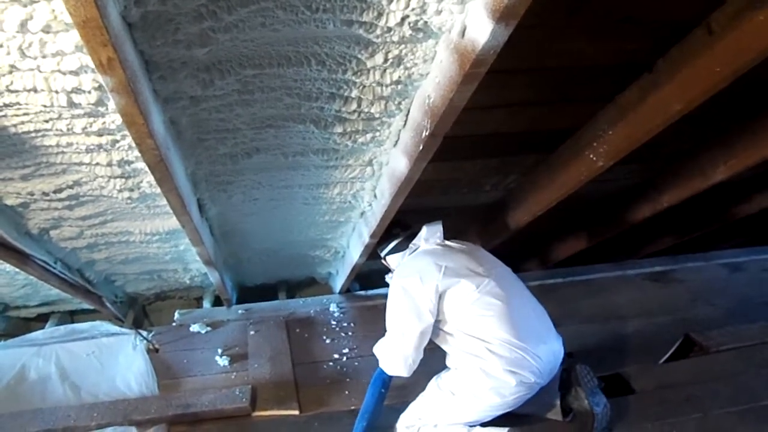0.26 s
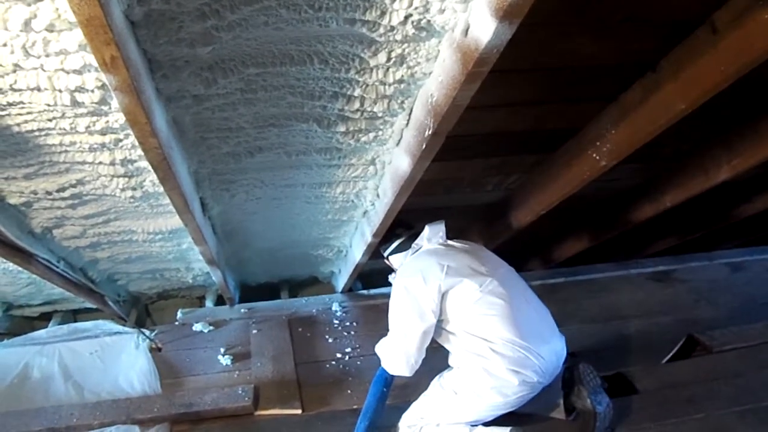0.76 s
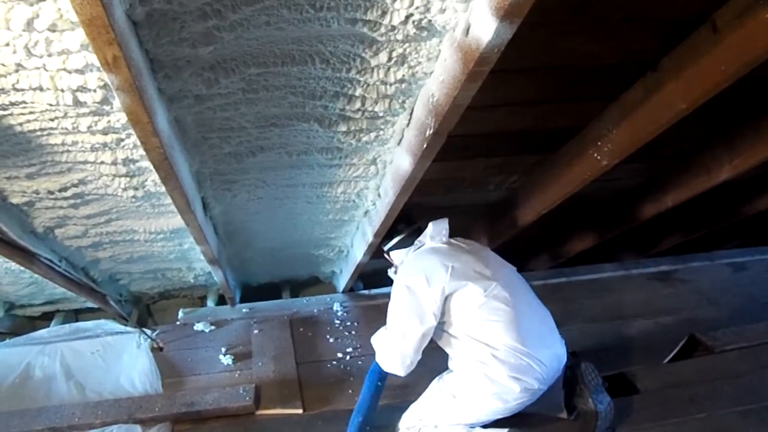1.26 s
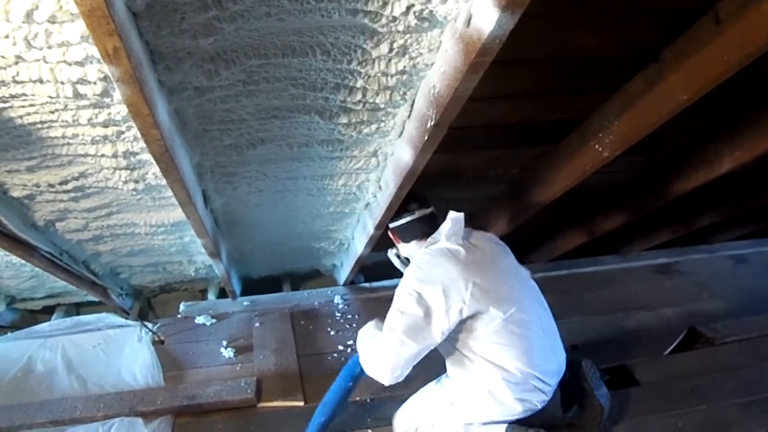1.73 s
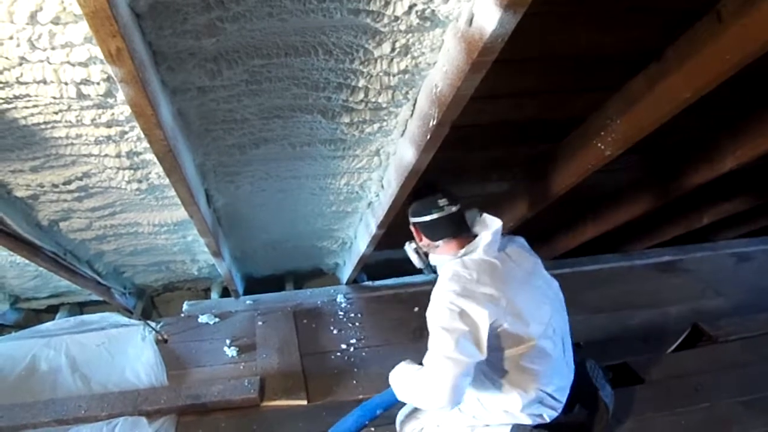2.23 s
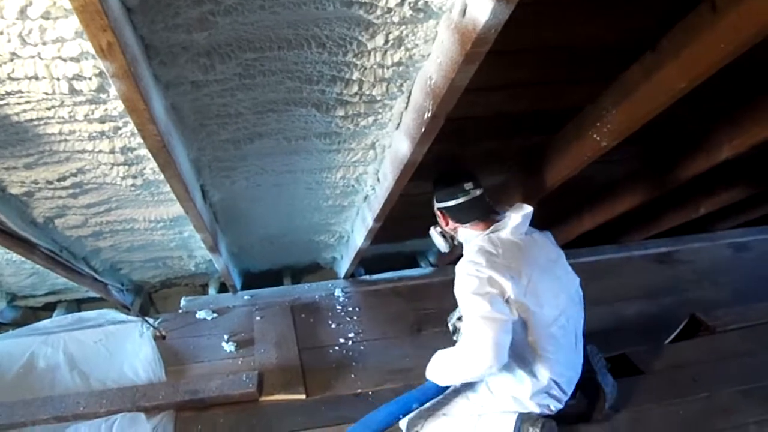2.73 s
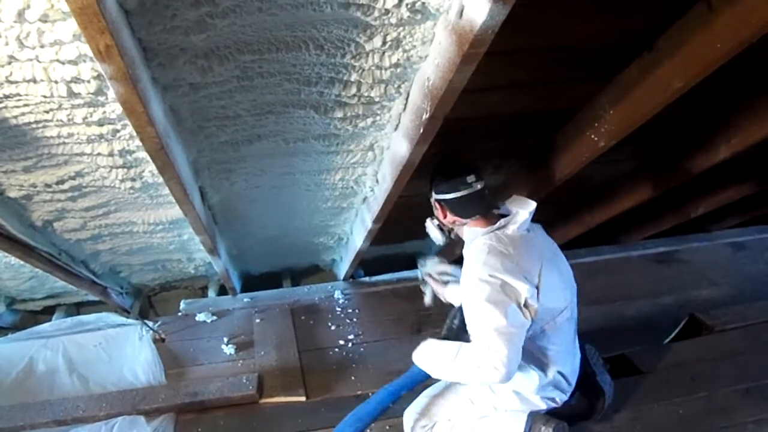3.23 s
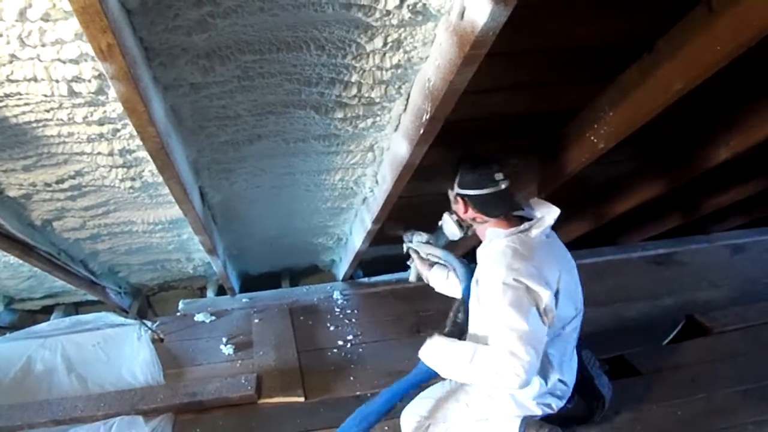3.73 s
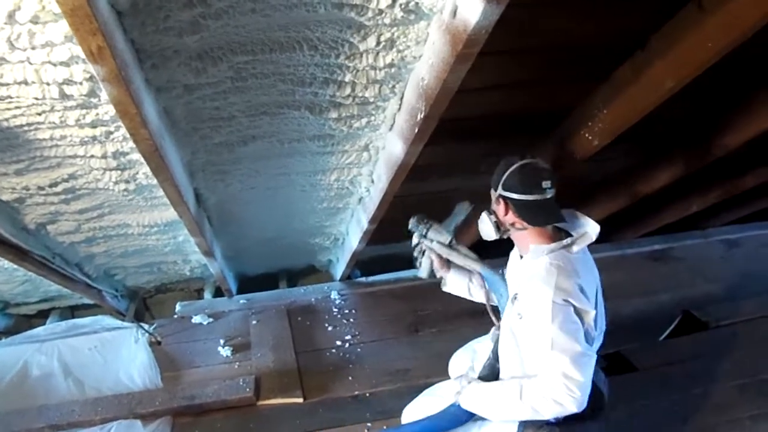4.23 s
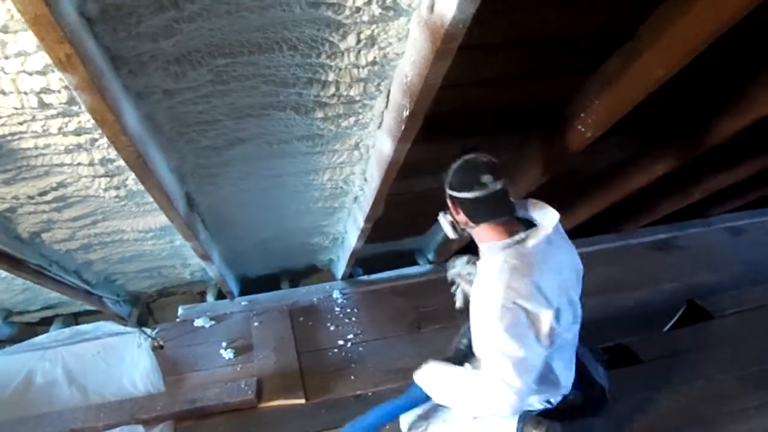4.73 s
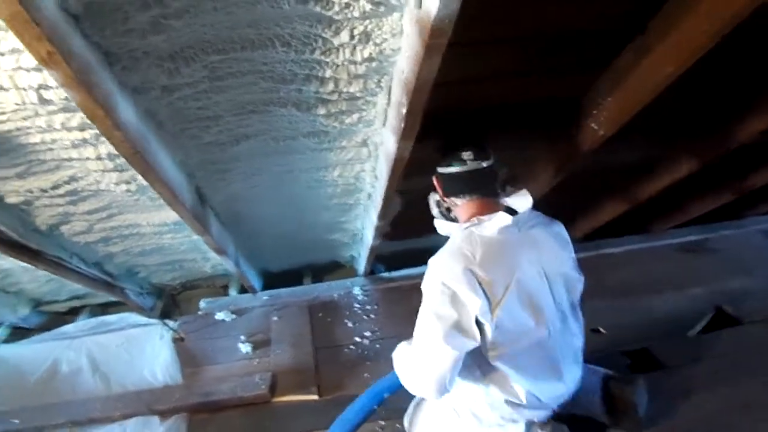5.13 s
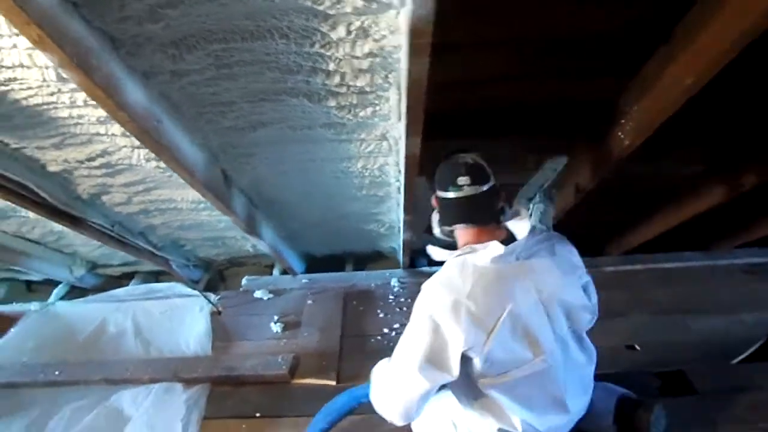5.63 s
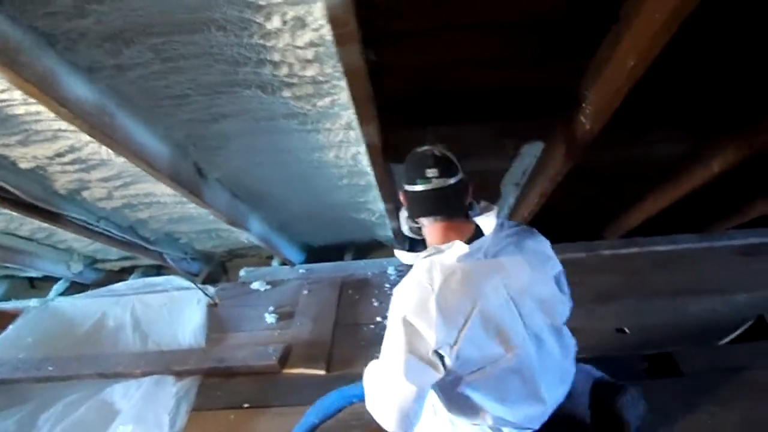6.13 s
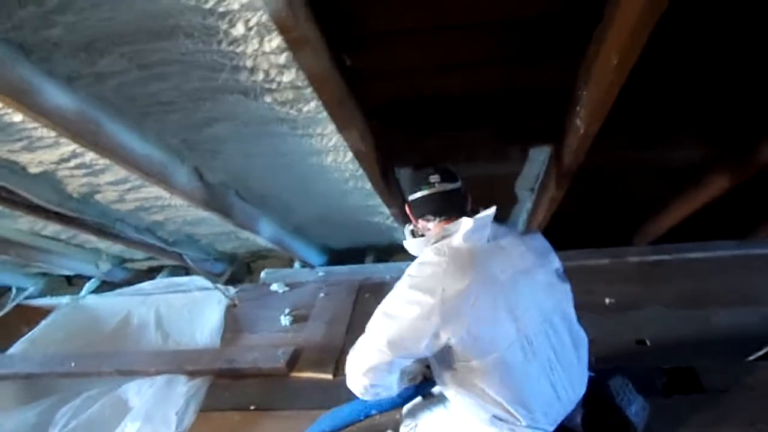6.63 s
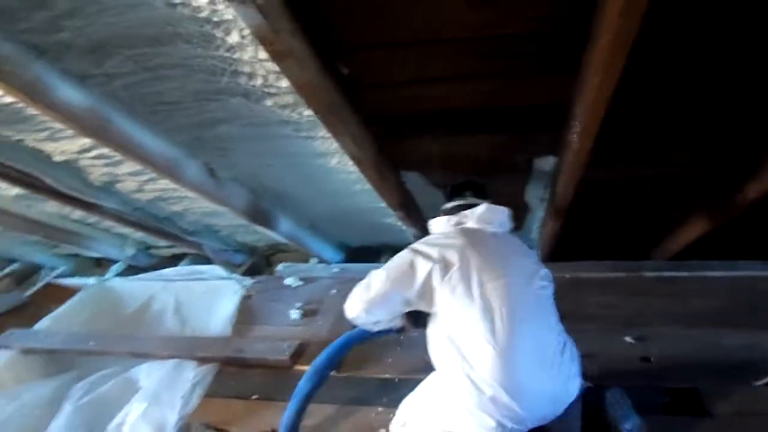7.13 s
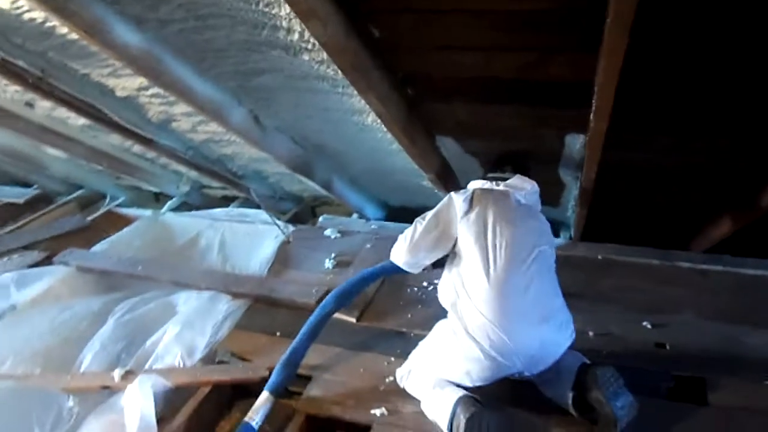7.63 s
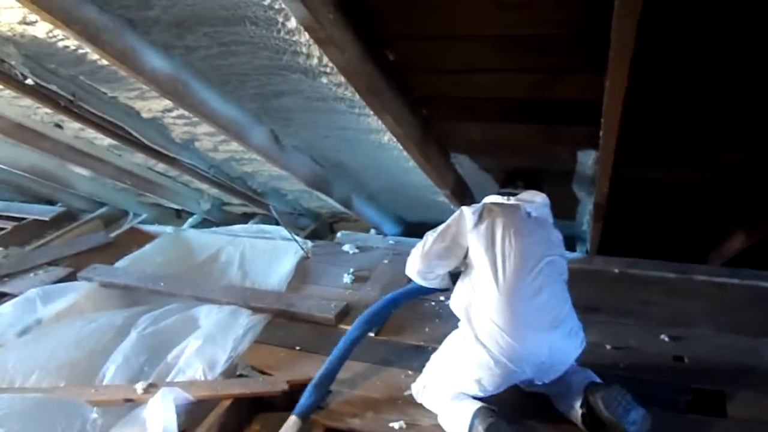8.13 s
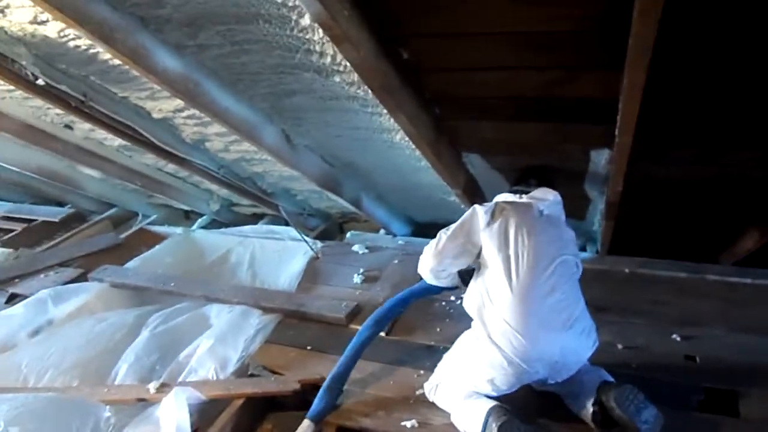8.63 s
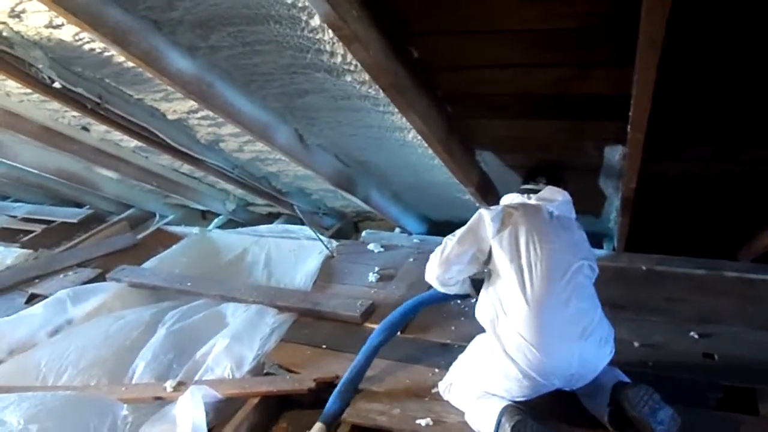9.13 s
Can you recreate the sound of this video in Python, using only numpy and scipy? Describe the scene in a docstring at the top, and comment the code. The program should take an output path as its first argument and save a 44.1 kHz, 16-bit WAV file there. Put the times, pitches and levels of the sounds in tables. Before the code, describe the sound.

Soft air hiss and low machine throb, then a one-second spray burst that closes with a puff and a hard wooden knock. Two brief spurts follow, with rustling, faint creaks and board thumps between them. The hiss grows as the worker shifts and bumps the planks, then a loud long spray runs to the end with hollow taps. Close, dry attic, one microphone.

```python
"""A foam gun in a boarded attic: each trigger pull is a jet of turbulent noise through a short pipe, closed at
one end, that rings at odd multiples. Purge air, shaped noise, hisses at the tip between pulls. The kneeling worker
rustles and rumbles (noise), knocks and taps (decaying modes) and creaks the boards (narrow noise). A far compressor,
sines on one stroke rate, runs down and leaves a slower engine; a drone, a whine and attic air lie under it.
One microphone."""
import sys
import numpy as np
from scipy import signal
from scipy.fft import rfft, irfft
from scipy.io import wavfile
from scipy.ndimage import uniform_filter1d, map_coordinates

SR = 44100
rng = np.random.default_rng(int(sys.argv[2]) if len(sys.argv) > 2 else 0)


def generate_wav(sig):
    """Save sig (samples, or channels by samples) to the path in sys.argv[1] as 16-bit PCM at SR."""
    pcm = np.round(np.clip(np.atleast_2d(sig).T, -1, 1) * 32767).astype(np.int16)
    wavfile.write(sys.argv[1], SR, pcm)


N = 412776

# Trigger pulls. Each row: pulled in seconds, let go in seconds, burst level in dB, steady jet level in dB,
# settling time constant in seconds, creep in dB per second, pipe ring over the jet in dB, puff level in dB,
# change of ring in the puff in dB.
TRIGGER_PULLS = [(0.907, 1.809, -17.5, -35, 0.19, 3.5, -15.5, -20, -5),
                 (3.648, 3.988, -11.5, -32.5, 0.35, -0.5, -13, -19, -2),
                 (5.283, 5.574, -22, -36, 0.49, -2, -11.5, -21.5, -6),
                 (7.7, 9.6, -10, -31, 0.19, 3.5, -12, -20, -4)]
# Jet turbulence spectrum. Each row: frequency in Hz, relative density in dB per Hz.
JET_SPECTRUM = [(300, -19.5), (600, -21.5), (1500, -15.5), (3000, -10.5), (4500, -6.5), (6000, -4),
                (9000, -4), (14000, -3.5), (15000, 0.5)]
# Pipe modes. Each row: frequency in Hz, width of each of two cascaded peaks in Hz, relative level in dB.
PIPE_MODES = [(771, 96, -18), (2271, 330, 1), (3730, 380, -2), (5280, 450, 0), (6870, 730, -2.5),
              (8350, 310, -4), (10070, 380, -7.5), (11290, 450, -11.5), (12600, 510, -5.5)]
# Brief flares of the pipe ring. Each row: centre in seconds, added level in dB, detune in per cent.
RING_FLARES = [(.918, 9.5, -1), (1.0, 0.5, -2), (1.051, 11, 1), (1.189, 8.5, -9), (1.25, 7.5, 0),
               (3.655, 5.5, 1), (3.75, 4, -1), (3.8, 7.5, -0.5), (3.9, 1.5, -0.5), (5.295, 1.5, 2),
               (5.37, 2.5, -1), (5.47, 3.5, 1.5), (5.55, -0.5, -0.5), (7.708, 10, 0), (7.775, 4, -0.5),
               (7.82, 2, -0.5)]
# Purge air while open. Each row: time in seconds, level in dB.
PURGE_LEVEL = [(0, -41), (.4, -39.5), (.75, -40), (.905, -36), (1.95, -44), (2.2, -39), (2.65, -35.5),
               (2.9, -37), (3.647, -29), (4.12, -40.5), (4.55, -39), (5.2, -42), (5.285, -37), (5.7, -37),
               (6.25, -37), (6.75, -36), (7.15, -30.5), (7.5, -31.5), (7.697, -28.5)]
# Purge air spectrum. Each row: frequency in Hz, relative density in dB per Hz.
PURGE_SPECTRUM = [(900, -37), (1500, -18.5), (2300, -9), (3800, -10), (5100, -4), (8000, -0.5),
                  (10000, -3.5), (12000, -0.5), (14000, -1), (15000, -3)]
# The worker's moves. Each row: start in seconds, length in seconds, suit and hose rustle in dB, board rumble in dB.
WORKER_MOVES = [(0.893, 1, -48.5, -55.5), (1.914, .08, -65, -35.5), (2.415, 0.31, -46.5, -49),
                (2.798, 0.9, -55.5, -57.5), (3.367, 0.22, -45, -48.5), (3.683, 0.38, -49, -56),
                (4.368, 0.045, -55.5, -57), (4.68, 0.095, -52, -54), (5.39, 0.24, -45.5, -45),
                (5.75, 0.44, -59, -63), (6.286, .08, -52, -48), (6.47, .3, -67, -45),
                (6.86, 0.37, -53, -56.5), (7.082, 0.1, -45, -38.5), (7.218, 0.1, -41, -44),
                (7.414, 0.28, -45, -46.5), (7.686, 0.029, -29.5, -43), (7.826, 0.076, -38.5, -40),
                (7.906, 0.43, -43, -43), (8.394, 0.57, -41.5, -53), (8.99, .4, -43.5, -41.5)]
# Rustle spectrum. Each row: frequency in Hz, relative density in dB per Hz.
RUSTLE_SPECTRUM = [(300, 4), (500, -1), (1000, 5.5), (2000, -0.5), (3000, -2.5), (5000, 0), (7000, -42)]
# Board rumble spectrum. Each row: frequency in Hz, relative density in dB per Hz.
RUMBLE_SPECTRUM = [(60, 4.5), (110, -2.5), (250, 1), (350, -3.5), (500, -10), (800, -11), (1200, -33)]
# Knees and hose on the boards. Each row: start in seconds, level of the ring's peak before decay in dB,
# pitch of the blow in Hz, t60 in seconds (on top of each part's own decay), joist thump before decay in dB rms.
BOARD_KNOCKS = [(1.905, -14.5, 630, 0.33, -33), (1.991, -33, 450, 0.71, -31.5),
                (3.599, -37, 360, 0.19, -54), (5.41, -30.5, 259.8, 1, -41), (5.46, -40, 685, 0.21, -62),
                (6.473, -37, 850, 0.14, -75), (6.496, -30, 200, 0.24, -54),
                (6.511, -25.5, 228, 0.41, -32.5), (7.087, -24, 880, 0.2, -55), (7.1, -38, 296, 0.75, -53),
                (7.25, -22, 250, 0.34, -61), (7.277, -19.5, 245, 0.42, -56), (7.308, -19, 257, 0.53, -53),
                (7.845, -21, 1200, 0.073, -62), (7.949, -27, 204, 0.5, -48), (8.129, -30, 239.4, 0.25, -44),
                (8.266, -27, 242, 0.31, -55)]
# Board modes. Each row: frequency in Hz, relative level in dB, t60 in seconds.
BOARD_MODES = [(136, -3.5, 0.63), (199, 1, 0.67), (240, -2, 0.27), (276.4, 0, 1), (345, -3, 0.4),
               (390, -28, 0.37), (492, -1, .4), (638, -22.5, 0.45), (703, -2.5, 0.56), (797, -4.5, 0.45),
               (914, -1, 0.13), (1020, -4, 0.099), (1460, -2, .1)]
# Boards creaking under load. Each row: start in seconds, length in seconds, frequency in Hz, level in dB rms.
BOARD_CREAKS = [(3.383, 0.32, 355, -49.5), (4.37, 0.062, 378, -56), (4.67, 0.077, 355, -56),
                (4.775, 0.11, 310, -47)]
# Taps on something hollow. Each row: start in seconds, level in dB.
HOLLOW_TAPS = [(8.953, -34), (9.201, -31)]
# Modes of the hollow thing. Each row: frequency in Hz, relative level in dB, t60 in seconds.
HOLLOW_MODES = [(131.5, -4.5, 0.97), (200, -2.5, 0.41), (274, -0.5, 0.81), (350, -9, 0.59), (504, -9, 0.35),
                (590, -2.5, 0.14), (712, -2, 0.23), (816, -9, 0.7)]
# Compressor run-down. Each row: time in seconds, strokes per second, level in dB.
COMPRESSOR_RUN = [(0, 27.5, -43.5), (5.3, 27.5, -43.5), (5.6, 24.8, -49), (5.85, 22, -56), (6.05, 20, -85)]
# Compressor partials. Each row: multiple of the stroke rate, relative level in dB.
STROKE_PARTIALS = [(.5, -13), (1, 0), (2, -9), (3, -15), (4, -7), (5, -19)]
# Engine lines. Each row: frequency in Hz, full-load level in dB rms.
ENGINE_LINES = [(16, -58), (48, -61), (61, -63), (97, -53)]
# Engine load. Each row: time in seconds, level over full load in dB.
ENGINE_LOAD_CURVE = [(0, -14), (5.7, -14), (6, 0), (9.36, 0)]
# Narrow machine whine. Each row: frequency in Hz, width in Hz, level in dB rms.
WHINE_BANDS = [(478, 14, -66.5), (1200, 7.4, -67.5)]
# Attic background spectrum. Each row: frequency in Hz, relative density in dB per Hz.
AIR_SPECTRUM = [(7.1, -10), (12, 10.5), (32, -5), (65, 0), (106, -1), (127, -23), (162, -7.5), (221, -20),
                (462, -10.5), (600, -112), (780, -51), (1320, -120)]

OPEN_S, OPEN_TREBLE_DB, TREBLE_FADE_S = 0.011, 5, 0.14
RING_DIP_DB, RING_BUILD_S, FLARE_S = -11, 0.02, 0.02
PUFF_RISE_S, PUFF_HOLD_S, PUFF_FALL_DB_PER_S = 0.032, 0.017, 312
PURGE_BACK_S = 0.11  # wait after letting go
MOVE_RISE_S, MOVE_FALL_S, STILL_RUSTLE_DB, STILL_RUMBLE_DB = 0.017, 0.074, -58, -60.5
DRONE_HZ, DRONE_DB, AIR_DB = 30.4, -53, -55
ATTIC_T60_S, ATTIC_DB = 0.15, -16
HEADROOM, CUTOFF_HZ = 0.54, 13960


def from_db(db):
    """Decibels to gain."""
    return 10 ** (np.asarray(db) / 20)


def rms_one(x):
    """Scale to unit rms."""
    return x / np.sqrt(np.mean(x ** 2) + 1e-20)


def in_time(rows):
    """Interpolate the columns of a table at every sample."""
    s, *columns = np.transpose(rows)
    return [np.interp(np.arange(N) / SR, s, c) for c in columns]


def drift(rate_hz):
    """Slow random wander of unit rms: noise through a double pole, run at SR / 40."""
    r = np.exp(-80 * np.pi * rate_hz / SR)
    noise = rng.standard_normal(N // 40 + 2002)
    slow = signal.lfilter([1], [1, -2 * r, r * r], noise)[2000:]  # drop the filter's start
    return np.interp(np.arange(N) / 40, np.arange(len(slow)), rms_one(slow))


def coloured(spectrum, flicker_db, rate_hz):
    """Unit-rms noise of this spectrum; octaves flicker partly together, partly alone."""
    hz = np.arange(N // 2 + 1) * SR / N + 1e-3
    at_hz, db = np.transpose(spectrum)
    density_db = np.interp(np.log(hz), np.log(at_hz), db, left=-90)
    shaped = rfft(rng.standard_normal(N)) * from_db(density_db)
    together, out = drift(rate_hz), 0
    first, last = np.floor(np.log2(at_hz[0])), np.ceil(np.log2(at_hz[-1]))
    for centre_hz in 2. ** np.arange(first, last + 1):
        share = np.clip(1 - np.abs(np.log2(hz / centre_hz)), 0, 1)
        flicker = from_db(flicker_db * (0.8 * together + drift(rate_hz)))
        out = out + irfft(shaped * share, N) * flicker
    return rms_one(out)


def resonance(x, hz, width_hz):
    """Two-pole peak with gain 1 on top."""
    r = np.exp(-np.pi * width_hz / SR)
    feedback = [1, -2 * r * np.cos(2 * np.pi * hz / SR), r * r]
    return signal.lfilter([(1 - r * r) / 2, 0, (r * r - 1) / 2], feedback, x)


def double_resonance(x, hz, width_hz):
    """Two equal peaks in cascade: steeper skirts."""
    return resonance(resonance(x, hz, width_hz), hz, width_hz)


def bump(start_s, rise_s, hold_s, fall_s):
    """Linear rise to 1, hold, then exponential decay."""
    t = np.arange(N) / SR - start_s
    return np.clip(t / rise_s, 0, 1) * np.exp(-np.maximum(t - rise_s - hold_s, 0) / fall_s)


def purge_air():
    """Turbulent hiss at the tip, shut off while the trigger is pulled."""
    level_db, = in_time(PURGE_LEVEL)
    t = np.arange(N) / SR
    shut = sum(1. * ((t > on) & (t < off + PURGE_BACK_S)) for on, off, *_ in TRIGGER_PULLS)
    valve = uniform_filter1d(1 - shut, size=600, mode="nearest")  # 14 ms ramps
    return valve * from_db(level_db) * coloured(PURGE_SPECTRUM, flicker_db=0.5, rate_hz=27.0)


def movement_gains():
    """Rustle and rumble gains: the powers of a quiet floor and of each move's swell add."""
    swells = np.array([bump(s, MOVE_RISE_S, length, MOVE_FALL_S) ** 2 for s, length, *_ in WORKER_MOVES])
    _, _, rustle_db, rumble_db = np.transpose(WORKER_MOVES)
    rustle = np.sqrt(from_db(STILL_RUSTLE_DB) ** 2 + from_db(rustle_db) ** 2 @ swells)
    rumble = np.sqrt(from_db(STILL_RUMBLE_DB) ** 2 + from_db(rumble_db) ** 2 @ swells)
    return rustle, rumble


def movement():
    """Friction noise of suit and hose, and low noise of weight shifting on the boards."""
    rustle_gain, rumble_gain = movement_gains()
    rustle = rustle_gain * coloured(RUSTLE_SPECTRUM, flicker_db=1.5, rate_hz=22.0)
    rumble = rumble_gain * coloured(RUMBLE_SPECTRUM, flicker_db=2.5, rate_hz=8.4)
    return rustle + rumble


def wavering(phase, db):
    """A sine at this rms level, swelling and sinking with 1 dB rms."""
    return np.sqrt(2) * from_db(db + drift(2)) * np.sin(phase + rng.uniform(0, 2 * np.pi))


def compressor():
    """Harmonics of a stroke rate that slows and fades."""
    strokes_per_s, db = in_time(COMPRESSOR_RUN)
    phase = 2 * np.pi * np.cumsum(strokes_per_s * (1 + 0.003 * drift(2))) / SR
    return sum(wavering(k * phase, db + part_db) for k, part_db in STROKE_PARTIALS)


def engine_and_drone():
    """Low lines sharing one unsteady clock; the drone beats with the compressor."""
    clock = 2 * np.pi * np.cumsum(1 + 0.006 * drift(2)) / SR
    load_db, = in_time(ENGINE_LOAD_CURVE)
    engine = sum(wavering(hz * clock, load_db + line_db) for hz, line_db in ENGINE_LINES)
    return engine + wavering(DRONE_HZ * clock, DRONE_DB)


def whine():
    """Noise through narrow peaks, wandering in level."""
    return sum(from_db(db + 2 * drift(0.58)) * rms_one(resonance(rng.standard_normal(N), hz, width_hz))
               for hz, width_hz, db in WHINE_BANDS)


def attic_air():
    """Low background noise of the attic."""
    return from_db(AIR_DB) * coloured(AIR_SPECTRUM, flicker_db=4.0, rate_hz=12)


def trigger():
    """Jet gain, ring over jet, detune and extra treble: a burst that settles, then a puff on letting go."""
    t = np.arange(N) / SR
    jet, ring_db, treble_db = np.zeros(N), np.zeros(N), np.zeros(N)
    for on, off, burst_db, steady_db, settle_s, creep, pipe_db, puff_db, puff_ring_db in TRIGGER_PULLS:
        since = np.maximum(t - on, 0)
        let_go = np.maximum(t - off, 0)
        falling = np.maximum(t - off - PUFF_RISE_S - PUFF_HOLD_S, 0)
        flow = from_db(steady_db + creep * since + (burst_db - steady_db) * np.exp(-since / settle_s))
        puff = np.clip((t - off) / PUFF_RISE_S, 0, 1)
        opening = 1 - np.exp(-since / OPEN_S)
        jet += opening * (flow + puff * from_db(puff_db)) * from_db(-PUFF_FALL_DB_PER_S * falling)
        during = (t > on - 0.01) & (t < off + 0.3)
        # the pipe rings weakly at first and builds up
        ring_db += during * (pipe_db + RING_DIP_DB * np.exp(-since / RING_BUILD_S) + puff_ring_db * puff)
        bright = np.exp(-since / TREBLE_FADE_S) + puff * np.exp(-let_go / PUFF_HOLD_S)
        treble_db += during * OPEN_TREBLE_DB * bright
    flares = [np.exp(-0.5 * ((t - s) / FLARE_S) ** 2) for s, *_ in RING_FLARES]
    _, flare_db, flare_detune = np.transpose(RING_FLARES)
    return jet, ring_db + flare_db @ flares, flare_detune @ flares, treble_db


def pipe_ring(detune_percent):
    """Turbulence, sputtering with the droplets, rings the pipe modes in alternating sign."""
    eddies = rng.standard_normal(N) * from_db(1.4 * drift(27.0))
    modes = [(-1) ** k * from_db(db + drift(4.3)) * rms_one(double_resonance(eddies, hz, width_hz))
             for k, (hz, width_hz, db) in enumerate(PIPE_MODES)]
    # the two lowest modes waver in pitch: read them faster or slower
    speed = 1 + (detune_percent + 0.8 * drift(8.)) / 100
    low = map_coordinates(sum(modes[:2]), [np.cumsum(speed)], order=3, mode="mirror")
    return low + sum(modes[2:])


def foam_jet():
    """Turbulent jet noise plus the pipe it rings, both under the trigger."""
    gain, ring_db, detune_percent, treble_db = trigger()
    pipe = pipe_ring(detune_percent)
    jet = coloured(JET_SPECTRUM, flicker_db=1.0, rate_hz=13.6)
    treble = signal.sosfilt(signal.butter(1, 8000., "high", fs=SR, output="sos"), jet)
    return gain * (jet + (from_db(treble_db) - 1) * treble + from_db(ring_db) * pipe)


def attic(x):
    """A short tail of dying noise from 6 ms on; fresh foam soaks up most of the sound."""
    t = np.arange(SR // 2) / SR
    tail = rng.standard_normal(len(t)) * from_db(-60 * t / ATTIC_T60_S) * (t > 0.006)
    return signal.fftconvolve(x, tail / np.sqrt(np.sum(tail ** 2)))[:N]


def knocks():
    """A blow rings the board modes near its own pitch, rattles around it and shakes the joists."""
    out, t = np.zeros(N), np.arange(SR // 2) / SR
    for s, peak_db, blow_hz, t60_s, thump_db in BOARD_KNOCKS:
        rings = 0
        for k, (hz, db, mode_t60_s) in enumerate(BOARD_MODES):
            off_pitch_db = -9.3 * np.abs(np.log2(hz / blow_hz))
            mode_db = db + off_pitch_db + rng.normal(0, 2.1) - 60 * t / mode_t60_s
            rings = rings + from_db(mode_db) * np.sin(2 * np.pi * hz * t) * (-1) ** k
        band = signal.butter(1, [blow_hz / 1.8, blow_hz * 1.23], "band", fs=SR, output="sos")
        rattle = rms_one(signal.sosfilt(band, rng.standard_normal(len(t))))
        # the first contact snaps
        crack = 0.5 * rng.standard_normal(len(t)) * from_db(-60 * t / 0.093)
        crack = signal.sosfilt(signal.butter(1, 2.8 * blow_hz, fs=SR, output="sos"), crack)
        hit = from_db(peak_db - 60 * t / t60_s) * (rings / np.abs(rings).max() + 0.14 * rattle + crack)
        joists = rms_one(resonance(rng.standard_normal(len(t)), 32.0, 41.0))
        joists = joists * from_db(thump_db - 60 * t / 0.53) * np.minimum(t / 0.0036, 1)
        i = round(s * SR)
        out[i:i + len(t)] += (hit + joists)[:N - i]
    return out


def creaks():
    """Boards under load: narrow-band noise in short swells."""
    out = np.zeros(N)
    for s, length_s, hz, db in BOARD_CREAKS:
        shape, = in_time([(s, 0), (s + 0.011, 1), (s + length_s, 0.7), (s + length_s + 0.026, 0)])
        out += from_db(db) * shape * rms_one(double_resonance(rng.standard_normal(N), hz, 36.0))
    return out


def taps():
    """Each tap strikes every hollow mode with a slightly different strength."""
    out, t = np.zeros(N), np.arange(SR // 2) / SR
    for s, tap_db in HOLLOW_TAPS:
        ring = 0
        for k, (hz, db, t60_s) in enumerate(HOLLOW_MODES):
            mode_db = tap_db + db + rng.normal(0, 1.7) - 60 * t / t60_s
            ring = ring + from_db(mode_db) * np.sin(2 * np.pi * hz * t) * (-1) ** k
        i = round(s * SR)
        out[i:i + len(t)] += ring[:N - i]
    return out


def scene():
    """All sources at one microphone; only the jet gets the attic's tail."""
    jet = foam_jet()
    machines = compressor() + engine_and_drone() + whine()
    worker = movement() + knocks() + creaks() + taps()
    mono = jet + from_db(ATTIC_DB) * attic(jet) + purge_air() + worker + machines + attic_air()
    return np.array([mono, mono])


def record(dry):
    """Round the loudest peaks, then cut the top steeply."""
    rounded = HEADROOM * np.tanh(dry / HEADROOM)
    return signal.sosfilt(signal.ellip(14, 0.3, 75, CUTOFF_HZ, fs=SR, output="sos"), rounded)


dry = scene()
out = record(dry)
generate_wav(out)
```